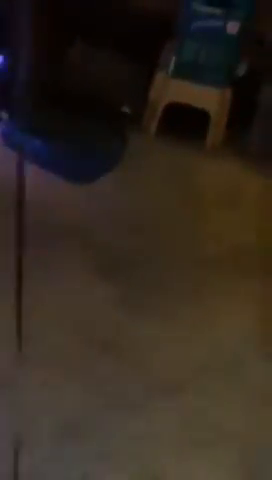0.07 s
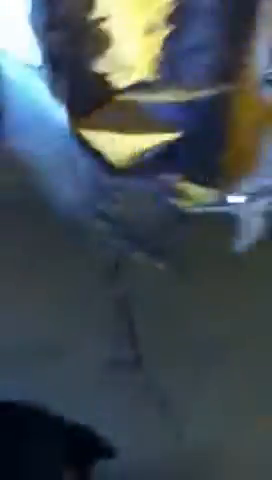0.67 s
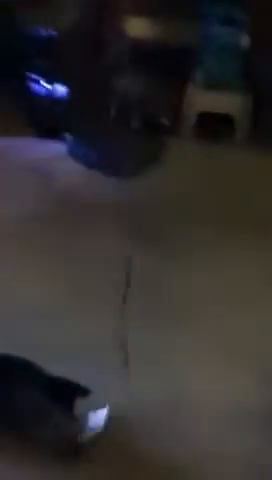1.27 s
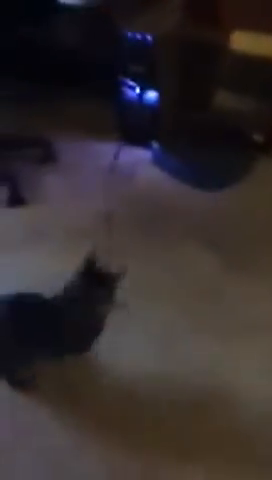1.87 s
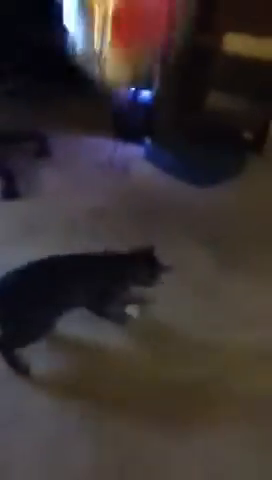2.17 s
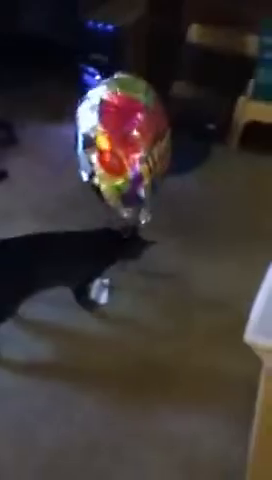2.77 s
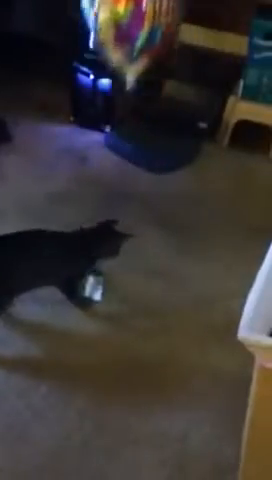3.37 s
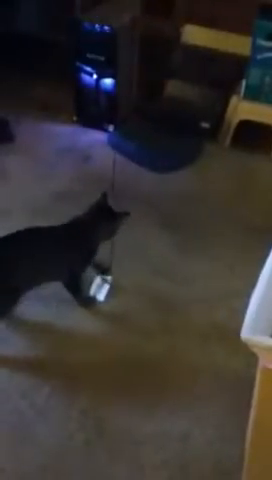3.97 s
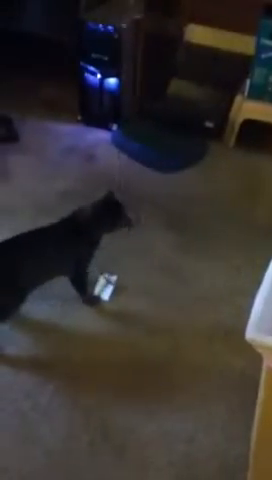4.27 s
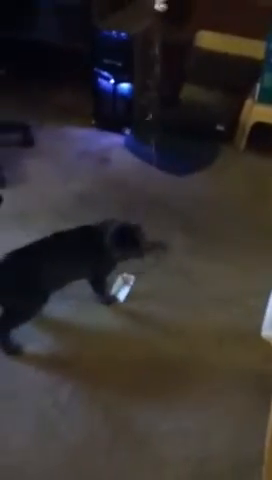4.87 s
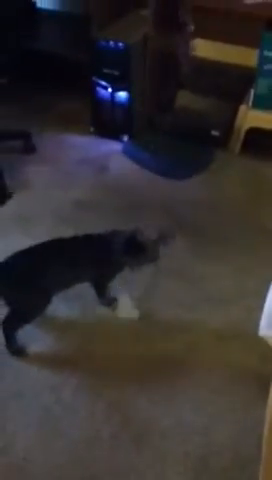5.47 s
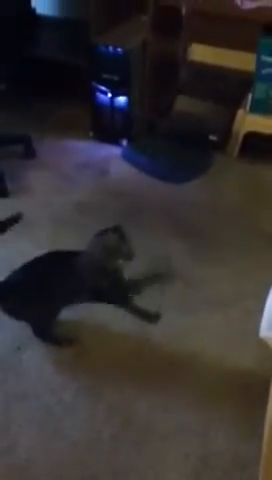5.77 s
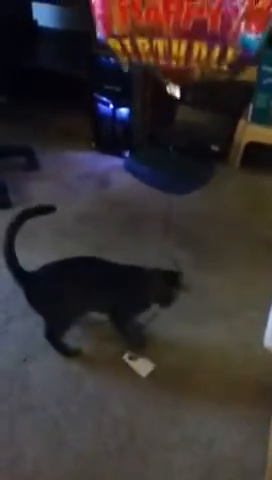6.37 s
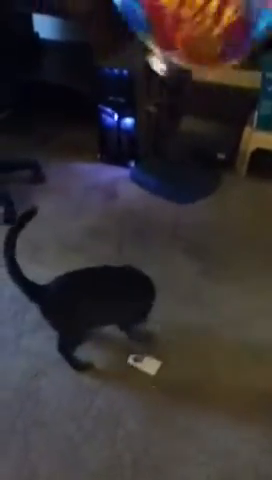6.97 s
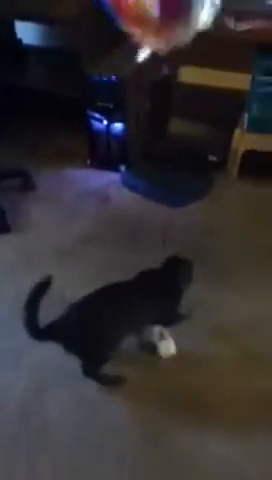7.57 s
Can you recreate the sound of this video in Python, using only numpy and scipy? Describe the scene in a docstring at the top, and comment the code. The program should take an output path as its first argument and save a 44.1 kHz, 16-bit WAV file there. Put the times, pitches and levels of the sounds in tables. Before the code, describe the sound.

A foil balloon crinkles and booms hollowly as a cat tugs its ribbon, with soft paw thuds over a faint fan hum.

```python
"""Cat and foil balloon

In a quiet room a cat bats a foil balloon's little weight across the floor. The balloon first drifts close
by, its creases snapping as they buckle. Each swat jerks the ribbon and shakes the taut skin, which booms,
crackles and rings with a hollow note. Paws thud, the weight ticks, and friction makes ribbon and foil
rustle and creak, over the steady air and hum of a computer's fans."""
import sys
import numpy as np
from scipy import signal
from scipy.fft import rfft, irfft, next_fast_len
from scipy.io import wavfile
from scipy.ndimage import map_coordinates

SR = 44100
rng = np.random.default_rng(int(sys.argv[2]) if len(sys.argv) > 2 else 0)


def log_audio(samples):
    """Write samples as a 16-bit WAV file to the path given in sys.argv[1]."""
    # one column per channel
    frames = np.atleast_2d(samples).T
    # limit to full scale, then quantise
    limited = np.clip(frames, -1, 1)
    pcm = np.round(limited * 32767).astype(np.int16)
    wavfile.write(sys.argv[1], SR, pcm)


N = 340452


def amp(db):
    """Amplitude ratio of a level in decibels."""
    return 10 ** (np.asarray(db) / 20)


def unit(x):
    """Normalisation to rms 1."""
    return x / np.sqrt(np.mean(x ** 2) + 1e-20)


def along(points, hz):
    """Interpolation of (frequency, value) points on a logarithmic frequency axis."""
    freqs, values = np.transpose(points)
    return np.interp(np.log(hz + 1), np.log(freqs + 1), values)


def contour(points):
    """Linear interpolation of (time, value) points at every sample."""
    times, values = np.transpose(points)
    return np.interp(np.arange(N) / SR, times, values)


def wobble(rate):
    """Smooth random modulation: a spline through `rate` Gaussian knots a second."""
    knots = rng.standard_normal(int(N * rate / SR) + 4)
    return map_coordinates(knots, [np.arange(N) * rate / SR])


def filtered(x, response):
    """Linear filtering: the spectrum of x times a frequency response."""
    size = next_fast_len(len(x) + 8192)
    return irfft(rfft(x, size) * response(np.fft.rfftfreq(size, 1 / SR)), size)[:len(x)]


def coloured(x, spectrum):
    """Spectral shaping by (frequency [Hz], gain [dB]) points, at rms 1."""
    return unit(filtered(x, lambda hz: amp(along(spectrum, hz))))


def shelf(hz, corner_hz):
    """High-pass response: 0 far below the corner, 1 far above it."""
    return hz ** 2 / (hz ** 2 + corner_hz ** 2)


def humps(resonances, hz):
    """Sum of Lorentzian resonance curves, each of height amp(weight / 2)."""
    return sum(amp(weight / 2) / (1 + (2 * (hz - centre) / width) ** 2)
               for centre, width, weight in resonances)


def add(track, s, sound):
    """Superposition of a sound on the track at time s, which may be negative."""
    start = round(s * SR)
    sound = sound[max(-start, 0):]
    part = track[max(start, 0):][:len(sound)]
    part += sound[:len(part)]


def damped(x, t60s, stretch=1, hold=0):
    """Frequency-dependent damping: after a hold, each band decays exponentially at its own rate."""
    hz, t, bands = signal.stft(x, SR, nperseg=256)
    age = np.maximum(t - hold, 0)
    t60 = stretch * along(t60s, hz)[:, None]
    return signal.istft(bands * amp(-60 * age / t60), SR)[1][:len(x)]


# spectra of the fans' rumble and of their airy hiss: (frequency [Hz], gain [dB])
RUMBLE_SPECTRUM = [(15, -48), (25, -9), (43, -12), (118, -3.5), (157, -5), (194, -3.5), (260, -12.5),
                   (301, -9), (387, -14.5), (448, -18), (492, -17.5), (525, -25), (600, -54), (780, -56),
                   (1320, -120)]
AIR_SPECTRUM = [(290, -10.5), (500, -5), (545, 2), (604, 0.5), (807, -0.5), (1180, -3.5), (1550, -5.5),
                (1820, -9), (2890, -11.5), (3700, -12), (5630, -12), (8580, -13), (13400, -16),
                (14900, -22), (16000, -17)]
# resonances of the airflow: (frequency [Hz], width [Hz], weight [dB])
FLOW_RESONANCES = [(350,19,-12.5), (441,75,-8), (678.6,33,-13.5), (737.5,14,2), (841,76,-18)]
# fan and power supply tones: (frequency [Hz], initial level [dB], slope [dB/s])
HUM_TONES = [(58.4, -61, 0), (192.3, -54.5, 0), (14993, -84, 0.56)]
# envelopes of the airflow and of one fan tone that swells and fades: (time [s], level [dB])
FLOW_LEVEL = [(0,-49), (1.5,-50.5), (3,-52), (6.9,-52), (7.72,-51)]
DRONE_LEVEL = [(0,-58), (0.6,-56.5), (1.3,-51), (2.6,-54), (4.5,-57.5), (6.5,-62), (7.72,-70)]
def fans(air_db=-2.5, drone_hz=123.7):
    """Fan noise: moving air gives a broadband spectrum, the motors slightly wavering tones."""
    t = np.arange(N) / SR
    level_db = contour(FLOW_LEVEL)
    response = lambda hz: amp(4.6 * humps(FLOW_RESONANCES, hz)) * shelf(hz, corner_hz=27.5) ** 2
    flow = lambda: filtered(rng.standard_normal(N), response)
    tone = lambda hz: np.sin(2 * np.pi * hz * t + 0.6 * wobble(6))
    rumble = amp(level_db) * coloured(flow(), RUMBLE_SPECTRUM)
    air = amp(level_db + air_db) * coloured(flow(), AIR_SPECTRUM)
    hum = sum(amp(db + slope * t + 0.29 * wobble(2.18)) * tone(hz) for hz, db, slope in HUM_TONES)
    drone = amp(contour(DRONE_LEVEL)) * tone(drone_hz)
    return rumble + air + hum + drone


# envelope of the midrange in the room's air: (time [s], level [dB])
SWELL_LEVEL = [(0,-61), (1.3,-74), (1.5,-57), (2.4,-67), (3.15,-75), (3.4,-57), (3.75,-58), (4,-73),
               (6,-70), (6.3,-63), (6.7,-75), (7.72,-72.5)]
def air_swell(centre_hz=800, width_hz=330):
    """Amplitude-modulated band noise: the air's midrange swells faintly now and then."""
    band = filtered(rng.standard_normal(N), lambda hz: humps([(centre_hz, width_hz, 0)], hz))
    return amp(contour(SWELL_LEVEL)) * unit(band)


# spectral envelope of the foil's noises: (frequency [Hz], gain [dB])
FOIL_SPECTRUM = [(300,-12), (1200,-2), (2700,-4), (8000,-2), (10000,-1), (12500,-5.5), (15500,-8)]
def foil_band(x, centre_hz, octaves):
    """Band-pass radiation: a patch of foil sounds most strongly near its own pitch; rms 1."""
    detuning = lambda hz: np.log2((hz + 1) / centre_hz) / octaves
    return unit(filtered(x, lambda hz: amp(along(FOIL_SPECTRUM, hz)) / (1 + detuning(hz) ** 2)))


def crackle(size, rate, spread_db):
    """Poisson impulses: tiny buckles of unequal strength, on average `rate` a second."""
    chance, strength = rng.random(size), rng.standard_normal(size)
    polarity = rng.choice([-1, 1], size)
    return (chance < rate / SR) * polarity * amp(spread_db * np.clip(strength, -2, 2))


# hollow resonances of the inflated foil: (frequency [Hz], width [Hz], weight [dB])
FOIL_RESONANCES = [(2430,160,-6), (3070,450,11), (4420,100,-25)]
def crinkle(size, centre_hz, octaves, cycles, count):
    """Shot noise: tiny facets flip at random, each a damped oscillator with its own pitch; rms 1."""
    start = rng.integers(0, size, count)
    pitch, strength = rng.standard_normal((2, count))
    hz = np.minimum(centre_hz * 2 ** (octaves * pitch), SR / 2)[:, None]
    age = np.arange(SR // 330)
    turns = hz * age / SR
    gain = amp(2.7 * np.clip(strength, -2, 2))[:, None] * np.sqrt(hz)
    grains = gain * np.sin(2 * np.pi * turns) * amp(-60 * turns / cycles)
    heap = np.bincount((start[:, None] + age).ravel(), grains.ravel(), size)[:size]
    return unit(filtered(heap, lambda f: amp(along(FOIL_SPECTRUM, f) + humps(FOIL_RESONANCES, f))))


# envelope of the skin's slow flexing: (time [s], level [dB])
FLEX_LEVEL = [(0,-56), (.4,-59), (.6,-50), (.85,-61.5), (1.15,-52.5), (1.35,-78), (1.65,-52), (2.28,-73),
              (2.45,-65.5), (5.3,-67), (6.1,-59.5), (6.8,-68.5), (7.5,-60), (7.72,-68)]
def flexing():
    """Small-scale buckling: as the balloon drifts, broad facets and finer wrinkles crackle faintly."""
    facets = crinkle(N, centre_hz=2750, octaves=0.37, cycles=5.3, count=4500)
    wrinkles = crinkle(N, centre_hz=5925, octaves=0.63, cycles=14, count=6500)
    level_db = contour(FLEX_LEVEL) + 1.86 * wobble(25)
    return amp(level_db) * (amp(-3) * facets + amp(-7) * wrinkles)


def rub(length, centre_hz, octaves):
    """Friction noise: one brief swell of fine crackle."""
    peak_s = 0.4 * max(length, 0.005)
    age = np.arange(SR // 8) / SR / peak_s
    return crinkle(len(age), centre_hz, octaves, cycles=18.6, count=600) * age * np.exp(1 - age)


# short rubs: (time [s], level [dB], length [s], centre frequency [Hz], spread [octaves])
RUSTLES = [(0.273,-50,0.0147,5500,0.84), (.511,-46,0.041,6000,0.63), (0.512,-42,0.059,2800,0.35),
           (0.568,-34.5,0.018,3390,0.6), (0.741,-48.5,0.0403,3850,0.47), (0.919,-49.5,.015,3960,0.72),
           (0.934,-42,0.043,4640,0.73), (0.97,-43,0.021,2600,0.83), (1.659,-43,0.014,6560,0.97),
           (1.722,-45.5,0.044,4280,0.84), (1.983,-36.5,0.028,3740,0.87), (2.068,-47.5,.03,5000,0.9),
           (2.093,-37,0.0135,4500,0.78), (2.209,-43,0.031,8500,0.49), (2.239,-45,0.07,4650,1.043),
           (2.691,-55.5,.028,5230,.6), (2.703,-43,0.014,7630,0.33), (3.814,-40.5,0.031,1880,0.174),
           (3.812,-45,0.016,3850,0.069), (4.564,-53,0.025,5500,0.76), (4.589,-46.5,0.018,4440,0.7),
           (4.612,-57,0.066,3780,0.79), (5.407,-57,.045,8000,.9), (5.434,-46,0.022,6950,0.76),
           (5.652,-50,0.025,6340,0.84), (5.935,-52,.022,6000,.9), (6.275,-49,0.037,7700,0.51),
           (6.381,-55,0.037,2870,0.2), (6.453,-52.5,0.019,3650,0.45), (6.939,-59,.03,2940,0.27),
           (7.047,-54.5,0.049,5960,0.93), (7.385,-55.5,0.0168,6500,0.43), (7.485,-55,0.042,5600,0.6),
           (7.587,-55,0.026,7000,0.68)]
def rustles():
    """Sliding friction: ribbon and foil rub over each other."""
    out = np.zeros(N)
    for s, db, length, centre_hz, octaves in RUSTLES:
        add(out, s, amp(db) * rub(length, centre_hz, octaves))
    return out


# dragged creases: (time [s], level [dB], length [s], frequency [Hz])
CREAKS = [(0.503,-42.5,0.037,2884), (0.729,-51,0.052,4476), (0.748,-50.5,0.043,2610),
          (0.973,-47,0.036,2200)]
def creaks():
    """Stick-slip friction: the slips of a crease excite one narrow resonance of the foil."""
    out = np.zeros(N)
    for s, db, length, hz in CREAKS:
        size = int(max(length, 0.01) * SR)
        slips = crackle(size, rate=1700, spread_db=2.5)
        note = foil_band(slips, hz, octaves=0.018)
        add(out, s, amp(db) * note * np.sin(np.pi * np.arange(size) / size))
    return out


def onset(t, rise_s):
    """Gradual loading: a raised-cosine rise from 0 to 1."""
    return np.sin(np.pi / 2 * np.minimum(t / rise_s, 1)) ** 2


# paws landing on the floor: (time [s], level [dB], frequency [Hz])
PAW_STEPS = [(1.666,-30.5,252), (1.773,-23,213), (2.022,-32,140), (2.12,-29,152), (3.926,-37.5,203),
             (4.564,-41,216), (4.617,-47,320), (4.657,-41,273), (5.959,-28,174), (6.146,-38,182)]
def paws(rise_s=0.0076, t60_s=0.079):
    """Cushioned impact: a pad takes the load gradually, and the floor soon damps the thud."""
    out, t = np.zeros(N), np.arange(SR // 8) / SR
    press = onset(t, rise_s) * amp(-60 * t / t60_s)
    for s, db, hz in PAW_STEPS:
        add(out, s, amp(db) * press * np.sin(2 * np.pi * hz * t))
    return out


# modes of the plastic weight: (frequency [Hz], level [dB], T60 [s])
WEIGHT_MODES = [(2420,0,0.02), (2925,-2,.022), (4960,-13,.012), (6130,-1,0.029), (7360,-2,0.013),
                (10400,-9,.01)]
# its contacts with the floor: (time [s], level [dB])
WEIGHT_TAPS = [(4.572,-41), (4.582,-39), (4.5997,-35), (6.2819,-35), (6.2863,-25.5), (6.2933,-36)]
def weight_taps(ring_db=-12.5, tick_db=-9, tick_t60_s=0.0077):
    """Hard impact: the weight ticks on the floor, then rings briefly in its normal modes."""
    out, t = np.zeros(N), np.arange(SR // 10) / SR
    for s, db in WEIGHT_TAPS:
        ring = sum(amp(level + rng.normal(0, 1.87) - 60 * t / t60) * np.sin(2 * np.pi * hz * t)
                   for hz, level, t60 in WEIGHT_MODES)
        noise = foil_band(rng.standard_normal(len(t)), centre_hz=5800, octaves=1.9)
        tick = noise * amp(tick_db - 60 * t / tick_t60_s)
        add(out, s, amp(db) * (tick + amp(ring_db) * ring))
    return out


def snap(hz, cycles, crack_cycles=14):
    """Snap-through buckling: a facet flips with a crack and rings, and the skin shivers."""
    t = np.arange(SR // 10) / SR
    life, phase = hz * t / cycles, 2 * np.pi * hz * t
    fade = amp(-60 * life) * (1 - np.exp(-life / 0.02))
    ring = fade * (np.sin(phase) + np.sin(1.17 * phase) + 0.36 * np.sin(0.893 * phase))
    age = phase / 2
    flip = 3 * age * (2 - age) * np.exp(-age)  # one push and pull of air
    splinters = 1.6 * fade * foil_band(rng.standard_normal(len(t)), hz, octaves=0.61)
    shiver = foil_band(rng.standard_normal(len(t)), hz, octaves=1) * amp(-17 - 60 * t / 0.0375)
    crack_share = 1 / (1 + (cycles / crack_cycles) ** 2)  # a short-lived facet is mostly crack
    return (1 - crack_share) * ring + crack_share * (flip + splinters) + shiver


# creases popping through: (time [s], level [dB], facet frequency [Hz], T60 [cycles])
CREASE_SNAPS = [(.5116,-20.5,2040,20), (0.515,-30.5,2780,25), (.522,-26,2550,34), (0.5311,-30.5,2730,30),
                (0.5559,-15,5400,9), (0.5637,-18,9630,29), (.5638,-9,2640,23), (.5644,-17,1710,25),
                (.573,-23,3900,28), (.5793,-21,4800,18), (0.5877,-25,3250,32), (.775,-26,2580,30.3),
                (0.828,-40,3100,34), (.866,-39.5,2700,40), (.939,-29.5,2370,39.5), (0.952,-25,3100,30),
                (.9575,-29.5,2170,29), (0.98,-30,2900,24), (.984,-27,6500,13), (0.984,-20.5,2160,37),
                (1.066,-36,6500,14), (1.0837,-24,6100,16), (1.153,-37,6000,12), (1.198,-37,6500,14),
                (1.67,-19,3400,2.2), (1.999,-16,4160,11), (2.045,-24,5200,14), (2.1092,-17,3500,9.1),
                (2.1134,-10.5,6500,13), (2.212,-26,10500,14.5), (2.2116,-9,8130,32), (2.2117,-19.5,5870,58),
                (2.2492,-23.5,5200,16), (2.262,-28,7500,20), (4.5995,-26,4080,22), (5.441,-31,7600,15),
                (5.446,-35,3000,15.5), (5.452,-29,7000,17), (5.6935,-34.5,7000,16.5), (6.146,-32,3280,16),
                (6.153,-31,5500,14.6), (6.403,-39,2920,23), (6.463,-37,3500,25)]
def crease_snaps(chain_db=-15, chain_s=0.031):
    """Buckling cascade: each crease that pops sets off two weaker neighbours of about its own size."""
    out = np.zeros(N)
    for s, db, hz, cycles in CREASE_SNAPS:
        add(out, s, amp(db) * snap(hz, cycles))
        delays = chain_s * rng.uniform(0.29, 1, size=2)
        octaves = rng.normal(0.214, 0.35, size=2)
        for delay, octave in zip(delays, octaves):
            add(out, s + delay, amp(db + chain_db) * snap(hz * 2 ** octave, cycles))
    return filtered(out, lambda hz: amp(along(FOIL_SPECTRUM, hz)))


# broad spectrum of the shaken balloon: (frequency [Hz], gain [dB])
SKIN_SPECTRUM = [(65, -40), (110, -21), (167, 1), (523, -3.5), (657, -0.5), (714, -5), (1200, -6),
                 (1540, -7.5), (1780, -10), (2540, -10.5), (3540, -12), (9400, -17.5), (13700, -24.5),
                 (15800, -38)]
# its stronger resonances: (frequency [Hz], width [Hz], weight [dB])
SKIN_RESONANCES = [(287,27,12), (463,98,-7), (636,150,-5), (871,140,11), (1220,206,2), (1810,250,-18.5),
                   (3600,260,-8)]
def skin_response(hz, bass_db, treble_db):
    """Frequency response of the skin: resonant peaks on a broad spectrum, tilted in bass and treble."""
    tilt_db = bass_db * (1 - shelf(hz, corner_hz=500)) + treble_db * shelf(hz, corner_hz=4140)
    return amp(along(SKIN_SPECTRUM, hz) + 2.5 * humps(SKIN_RESONANCES, hz) + tilt_db)


# partials of the hollow note: (frequency ratio [1], level relative to the tug [dB])
SKIN_MODES = [(1.002,-9.5), (1.201,-15.5), (1.5,-12.5), (1.879,-12), (2.3,-27), (2.64,-25)]
def hollow_note(note_hz, t, t60_s=0.16):
    """Membrane modes: the taut skin rings briefly, wavering in phase as it shakes."""
    modes = np.zeros(len(t))
    for ratio, db in SKIN_MODES:
        phase = 2 * np.pi * (ratio * note_hz * t + rng.random())
        waver = 0.5 * wobble(90)[:len(t)]
        modes += amp(db) * np.sin(phase + waver)
    return modes * amp(-60 * t / t60_s)


def dispersed(x, bass_lag_s=0.02, corner_hz=191.1):
    """Dispersion: low ripples cross the skin more slowly than high ones, so each boom falls in pitch."""
    lag_cycles = lambda hz: bass_lag_s * corner_hz * np.arctan(hz / corner_hz)
    return filtered(x, lambda hz: np.exp(-2j * np.pi * lag_cycles(hz)))


# decay of the skin after a full-strength tug: (frequency [Hz], T60 [s])
SKIN_DECAY = [(200, 0.32), (1000, 0.32), (4000, 0.34), (12000, 0.24)]
# jerks of the ribbon: (time [s], level [dB], bass [dB], treble [dB], rise [s], hold [s], note [Hz])
RIBBON_TUGS = [(-0.012,-33.5,1.5,3,.01,0.012,902), (0.647,-43,-4,-26,0.0113,.008,667),
               (1.762,-21.3,-6,2.5,0.013,0.0064,664), (1.985,-33,-4.5,-2.5,0.012,0.036,644),
               (2.097,-22.5,-1.5,5,0.0084,0.0042,641.4), (2.2,-33.5,-14,5,0.013,.004,743),
               (3.8083,-28.5,0,7,0.0088,0.0035,428), (3.856,-36,-1.5,2,0.033,0.015,710),
               (4.595,-42,-2,0,0.016,.01,374), (4.651,-50.5,-2,0,0.032,0.033,525),
               (5.944,-30,-3,3.5,0.015,0.042,603), (6.281,-44,-12,8.5,0.012,.003,820),
               (7.025,-46,4,-9,0.0183,0.029,705), (7.279,-52.5,-4,-5,0.017,0.0546,894)]
def ribbon_tugs(full_tug_db=-15.5, split_hz=1640, paper_db=-1, boom_db=-1.5, slide_db=-29, lead_s=0.0058):
    """Transient excitation: the ribbon snaps taut; the skin booms below split_hz and crackles above."""
    out, t = np.zeros(N), np.arange(SR // 2) / SR
    for s, db, bass_db, treble_db, rise, hold, note_hz in RIBBON_TUGS:
        swell = onset(t, rise)
        colour = lambda hz: skin_response(hz, bass_db, treble_db)
        colour_rms = np.sqrt(np.mean(colour(np.fft.rfftfreq(len(t), 1 / SR)) ** 2))
        buckles = unit(crackle(len(t), rate=7600, spread_db=8.5))
        rattle = unit(buckles + rng.standard_normal(len(t)))
        clumps = unit(amp(1.7 * wobble(340)[:len(t)]))
        paper = filtered(rattle * clumps, lambda hz: colour(hz) * np.sqrt(shelf(hz, split_hz)))
        noise = rng.standard_normal(len(t))
        boom = filtered(noise, lambda hz: colour(hz) * np.sqrt(1 - shelf(hz, split_hz)))
        shake = (amp(paper_db) * paper + amp(boom_db) * boom) / colour_rms
        stretch = 1.01 * np.exp(0.0372 * (db - full_tug_db))  # a weaker tug dies away sooner
        skin = damped(shake, SKIN_DECAY, stretch, hold) + hollow_note(note_hz, t)
        add(out, s, amp(db) * swell * skin)
        slide = rub(length=0.027, centre_hz=4970, octaves=0.82)  # the slack ribbon slides first
        add(out, s - lead_s, amp(db + slide_db) * slide)
    return dispersed(out)


# reverberation time of the small furnished room: (frequency [Hz], T60 [s])
ROOM_DECAY = [(200, 0.53), (2000, 0.51), (12000, 0.37)]
def reverberation(x):
    """Diffuse field: convolution with a decaying noise tail of unit energy."""
    tail = damped(rng.standard_normal(SR // 2), ROOM_DECAY)
    return signal.fftconvolve(x, tail / np.linalg.norm(tail))[:N]


def scene():
    """Superposition of direct and reverberant sound; the near snaps stay almost dry."""
    play = ribbon_tugs() + rustles() + creaks() + flexing() + paws() + weight_taps()
    snaps = crease_snaps()
    room = reverberation(amp(-9) * play + amp(-22) * snaps)
    return (play + snaps + room + fans() + air_swell())[None]


def record(dry, top_hz=15900):
    """Band limiting: an ideal low-pass filter keeps nothing above top_hz."""
    return np.array([filtered(channel, lambda hz: hz < top_hz) for channel in dry])


dry = scene()
out = record(dry)
log_audio(out)
```